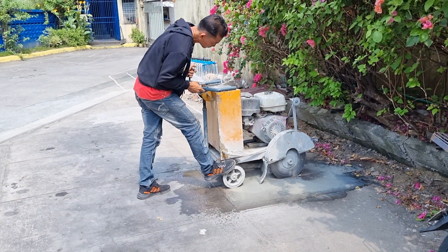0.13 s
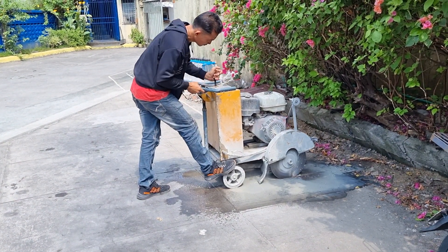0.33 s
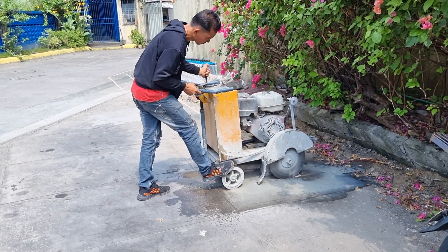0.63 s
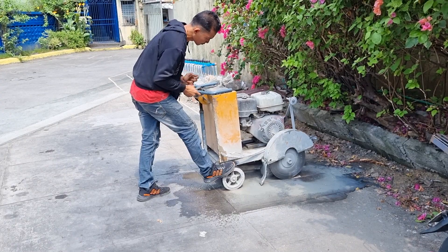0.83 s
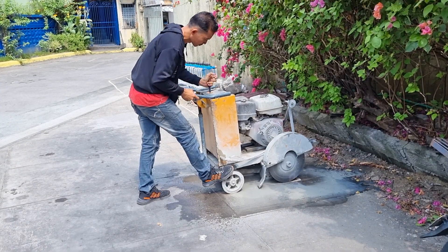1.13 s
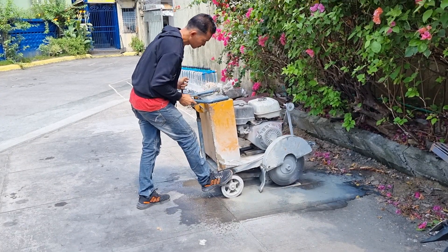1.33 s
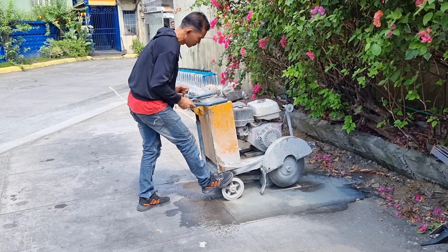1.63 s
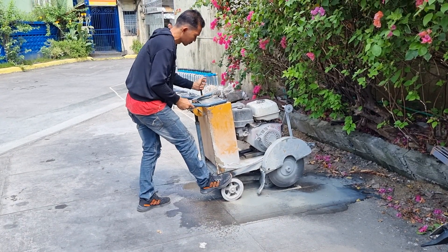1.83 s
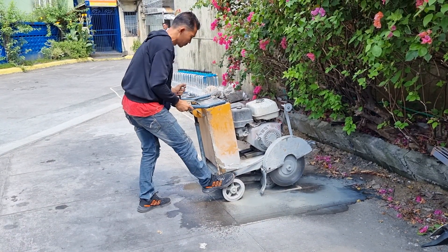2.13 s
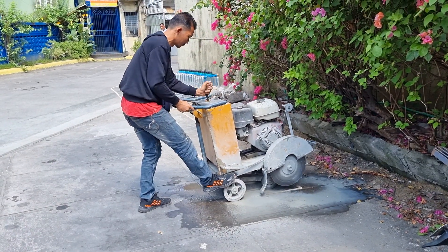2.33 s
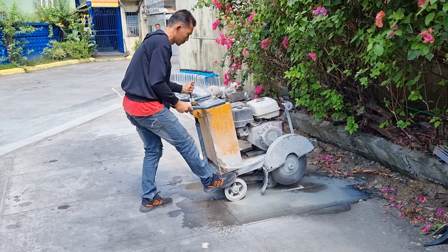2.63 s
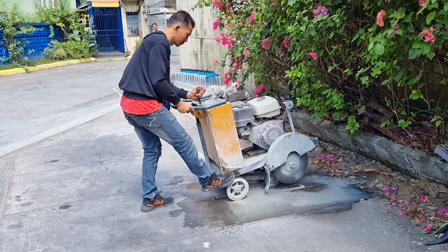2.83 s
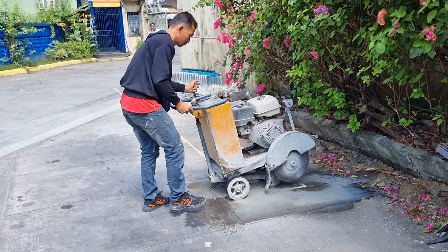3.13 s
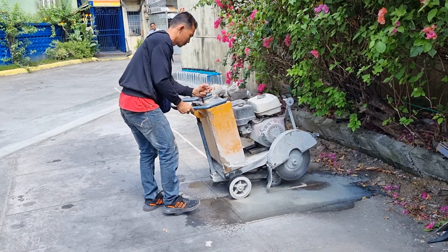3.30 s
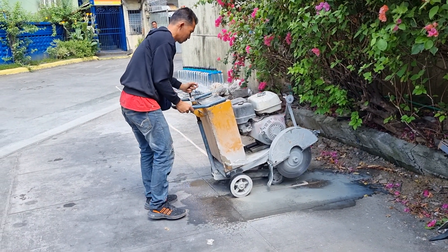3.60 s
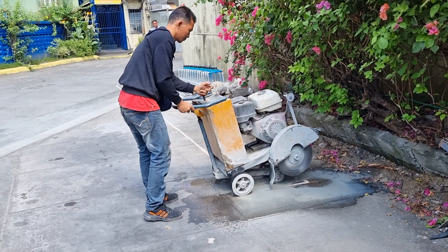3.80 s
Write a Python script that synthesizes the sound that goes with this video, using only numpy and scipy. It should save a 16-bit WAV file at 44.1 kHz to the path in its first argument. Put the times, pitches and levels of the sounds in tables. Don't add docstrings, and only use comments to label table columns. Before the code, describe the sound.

A walk-behind concrete saw with a steady single-cylinder engine grinds gritty pavement under a high metallic song; the blade soon lifts, leaving droning exhaust and rattling casing, captured outdoors by a phone in stereo.

```python
import sys
import numpy as np
from scipy import signal
from scipy.fft import rfft, irfft, next_fast_len
from scipy.io import wavfile
from scipy.ndimage import uniform_filter1d, map_coordinates

SR = 44100
rng = np.random.default_rng(int(sys.argv[2]) if len(sys.argv) > 2 else 0)


def linear_from_db(decibels):
    return 10 ** (np.asarray(decibels, float) / 20)


def unload_wav(signal):
    wavfile.write(
        sys.argv[1],
        SR,
        np.round(np.clip(np.atleast_2d(signal).T, -1, 1) * 32767).astype(np.int16),
    )


N = 174636


def unit(x):
    return x / np.sqrt(np.mean(x ** 2) + 1e-20)


def along(points, hz):
    f, v = np.transpose(points)
    return np.interp(np.log(hz + 1), np.log(f + 1), v)


def curve(rows):
    return np.interp(np.arange(N) / SR, *np.transpose(rows))


def wobble(rate):
    knots = rng.standard_normal(400)
    return map_coordinates(knots, [np.arange(N) * min(rate, 90) / SR])


def filtered(x, response):
    m = next_fast_len(N + SR // 2)
    return irfft(rfft(x, m) * response(np.fft.rfftfreq(m, 1 / SR)), m)[..., :N]


def ringing(x, peaks):
    def response(f):
        total = 0
        for k, (centre, width, db) in enumerate(peaks):
            damping = 1j * f * width
            total = total + (-1) ** k * linear_from_db(db) * damping / (centre * centre - f * f + damping)
        return total
    return filtered(x, response)


def patchy(depth_db):
    z = signal.stft(rng.standard_normal((2, N)), nperseg=512)[2]
    field = rng.standard_normal(z.shape[1:])
    field = uniform_filter1d(uniform_filter1d(field, 6, 0), 10, 1)
    return unit(signal.istft(z * linear_from_db(depth_db * unit(field)), nperseg=512)[1][:, :N])


# start_s, firings_per_s
ENGINE_SPEED = [
    (0, 27.4),
    (.4, 27.2),
    (.9, 27.38),
    (1.6, 27.28),
    (2.2, 27.45),
    (3.2, 27.34),
    (3.96, 27.42),
]


def engine_cycle():
    return np.cumsum(curve(ENGINE_SPEED)) / SR


EXHAUST_ORDERS_DB = [-17, -6.5, -13.5, 1.5, -5.5, -7, -12.5, -12.5, -13, -13, -16, -17.5, -18.5, -26]
WHINE_ORDERS = [20, 26, 27, 31, 33, 34, 42, 45, 47, 52, 64, 80]
WHINE_DB = [-12, -18, -7.5, -8.5, -11.5, -6.5, -16.5, -12, -19.5, -10, -16, -12]
# pitch_hz, width_hz
SHAFT_TONES = [(200, 10), (224, 5), (8742, 12), (14987, 12)]
SHAFT_DB = [-42.5, -35.5, -57.5, -69]


def exhaust(cycle):
    exhaust_db, waver_db, waver_rad = -31, 0.5, 0.27
    low = [(k + 1, db) for k, db in enumerate(EXHAUST_ORDERS_DB)]
    orders = np.zeros(N)
    for k, db in low + list(zip(WHINE_ORDERS, WHINE_DB)):
        level = linear_from_db(db + waver_db * wobble(11))
        drift = rng.uniform(0, 2 * np.pi) + waver_rad * (1 + k / 20) * wobble(6)
        orders += level * np.sin(2 * np.pi * k * cycle + drift)
    hum = np.zeros(N)
    for (hz, width), db in zip(SHAFT_TONES, SHAFT_DB):
        hum += linear_from_db(db) * unit(ringing(rng.standard_normal(N), [(hz, width, 0)]))
    return linear_from_db(exhaust_db) * np.sqrt(2) * orders + hum


# pitch_hz, width_hz, level_db
CASING_MODES = [(212, 97, -7.5), (570.6, 40, -7.5), (718, 90.6, 1), (956, 140, -4.5), (1273, 174, -5.5),
                (1393, 140, -3), (1746, 120, -6.5), (2304, 84, -12), (2613, 87, -8), (7760, 1600, -22.5)]


def casing(cycle):
    knock_db, rattle_db = -37, -25
    scatter_db, jitter_s, second_turn_db = -1, 0.000088, 6
    turns = np.flatnonzero(np.diff(np.floor(2 * cycle)))
    chance = rng.standard_normal((400, 2))[:len(turns)]
    late = np.round(jitter_s * SR * chance[:, 0]).astype(int)
    at = np.clip(turns + late, 0, N - 1)
    knocks = np.zeros(N)
    knocks[at] = linear_from_db(scatter_db * chance[:, 1] + second_turn_db * (np.arange(len(turns)) % 2))
    pulse = 1 + .15 * np.cos(4 * np.pi * cycle) + 0.099 * np.cos(2 * np.pi * cycle)
    rattle = patchy(0.85) * pulse
    return linear_from_db(knock_db) * unit(ringing(knocks, CASING_MODES)), linear_from_db(rattle_db) * unit(ringing(rattle, CASING_MODES))


# start_s, level_db
CONTACT = [
    (0, 3),
    (.2, 3.5),
    (.3, 5.5),
    (.46, 3),
    (.55, 5.5),
    (.65, 3.5),
    (.7, 5),
    (.76, 1.5),
    (.83, 2),
]
LIFT_S, LIFT_FADE_S = .845, .015


def bite(t):
    return linear_from_db(curve(CONTACT)) / (1 + np.exp(np.clip((t - LIFT_S) / LIFT_FADE_S * 3, -50, 50)))


# pitch_hz, level_db per Hz
GRIT_COLOUR = [(1200, -6), (2500, 4.5), (5000, 0.5), (6000, 6), (7500, 1.5), (10000, -1), (12000, -6.5),
               (15800, -3.5)]


def grit(pressure):
    def colour(hz):
        notch = 1 - np.exp(-((hz - 5690) / 90) ** 2)
        return linear_from_db(along(GRIT_COLOUR, hz)) * notch
    noise = patchy(2.2) * linear_from_db(.9 * wobble(11.4))
    return linear_from_db(-25.5) * unit(filtered(noise, colour)) * pressure


# pitch_hz, width_hz
DISC_MODES = [(3036, 12), (3605, 12), (3780, 20), (4510, 20), (4570, 30), (5092, 12), (5164, 14),
              (5255, 14), (5410, 12), (5523, 12), (6234, 12), (6468, 14), (7517, 14), (15688, 14)]
DISC_DB = [-2, -5, -10, -12, -4.5, -10, 0, 2.5, -2, -13, -5, 5.5, -2.5, -17]


def disc(pressure):
    drive = patchy(2.5)
    modes = [(hz, width, db) for (hz, width), db in zip(DISC_MODES, DISC_DB)]
    return linear_from_db(-30) * ringing(drive * pressure, modes) / np.std(ringing(drive, modes))


# pitch_hz, peak_s, span_s (15 dB down this far from the peak)
SINGING = [
    (4060, .35, .75),
    (4230, .3, .42),
]
SINGING_DB = [-26.5, -29.5]


def singing(t):
    start_s, ring_s, flutter_db = .035, .07, 2.8
    ring_on = np.exp(-np.maximum(t - LIFT_S, 0) / ring_s) * (1 - np.exp(-(t / start_s) ** 2))
    song = np.zeros((2, N))
    for (hz, peak_s, span_s), db in zip(SINGING, SINGING_DB):
        level = linear_from_db(db - 15 * ((t - peak_s) / span_s) ** 2 + flutter_db * wobble(19.8))
        phase = 2 * np.pi * hz * t + .8 * wobble(14.9) + [[0], [1.2]]
        song += level * ring_on * np.sin(phase)
    return song


def blade():
    t = np.arange(N) / SR
    pressure = bite(t)
    return grit(pressure) + disc(pressure) + singing(t)


# pitch_hz, level_db per Hz
FAN_COLOUR = [(60, -5), (200, -3), (450, -9), (1200, -7.5), (3000, -8.5), (5600, -16.5), (9200, -26),
              (16000, -32)]


def fan(cycle):
    pulse = 1 + .15 * np.cos(4 * np.pi * cycle + 1)
    rush = patchy(1.24) * pulse * linear_from_db(0.43 * wobble(8))
    return linear_from_db(-25.5) * unit(filtered(rush, lambda hz: linear_from_db(along(FAN_COLOUR, hz))))


def clatter(cycle):
    ticks_per_s = 1800
    pulse = 1 + .15 * np.cos(4 * np.pi * cycle + 1)
    shake = linear_from_db(0.85 * wobble(16) + 0.95 * wobble(8.6)) * pulse
    ticks = (rng.random(N) < ticks_per_s / SR) * shake * rng.standard_normal((2, N))
    return linear_from_db(-47) * unit(filtered(ticks, lambda hz: hz ** 2 / (hz ** 2 + 9000 ** 2)))


def bearing(cycle):
    flicker = linear_from_db(4.5 * wobble(30) + 2 * wobble(7.2)) * (1 + .4 * np.cos(4 * np.pi * cycle))
    noise = rng.standard_normal((2, N)) * flicker
    return linear_from_db(-46) * unit(ringing(noise, [(13600, 200, 0)]))


# pitch_hz, correlation
ALIKE = [(120, 0.95), (250, 0.99), (450, 0.69), (750, 0.91), (1300, 0.59), (2500, 0.46), (4200, 0.66),
         (9000, 0.16)]


def spread(noises):
    def turn(hz):
        angle = np.arccos(np.clip(along(ALIKE, hz), -1, 1)) / 2
        return np.array([np.cos(angle), np.sin(angle)])
    return filtered(noises, turn)


def scene():
    cycle = engine_cycle()
    knock, rattle = casing(cycle)
    mid, side = spread(rattle + fan(cycle) + clatter(cycle) + blade() + bearing(cycle))
    mid = mid + knock + exhaust(cycle)
    return np.array([mid + side, mid - side])


# pitch_hz, lead_rad
LEFT_LEADS = [(600, 0.0095), (800, 0.052), (1120, -1.44), (1400, -0.76), (3600, -0.95), (5200, 1.45),
              (7600, 0.67), (13800, 1.4)]
# pitch_hz, level_db
RIGHT_LOW = [(150, 0.33), (700, -2), (1300, 0.5), (2000, 3), (2500, 5.5), (3200, 3.5), (3750, 16),
             (4600, 16.5)]
# pitch_hz, level_db
RIGHT_HIGH = [(4600, 0.5), (5200, -15), (5900, -29.5), (7000, -14.5), (8200, -3.5), (9500, -8),
              (11500, -15), (15000, -8.5)]


def ports(x):
    def response(hz):
        bass_db = 4 / (1 + (hz / 70) ** 2)
        left = np.exp(1j * along(LEFT_LEADS, hz))
        right = linear_from_db(along(RIGHT_LOW, hz) + along(RIGHT_HIGH, hz) - bass_db)
        band = (hz < 15760) * hz ** 4 / (hz ** 4 + 36 ** 4)
        return np.array([left, right]) * band
    return filtered(x, response)


def roll_off(x):
    return signal.sosfilt(signal.butter(12, 15760, fs=SR, output="sos"), x)


# start_s, level_db
GAIN = [
    (0, 3),
    (.25, 1.5),
    (1.82, 1.5),
    (2.05, 5.5),
    (2.32, 9),
    (2.5, 8),
    (3.5, 7.5),
    (3.96, 9),
]


def record(dry):
    x = ports(dry) * linear_from_db(curve(GAIN) - 4)
    limit = 1.15
    x = np.clip(x / (1 + np.abs(x / limit) ** 4) ** (1 / 4), -1, 1)
    return roll_off(x)


dry = scene()
out = record(dry)
unload_wav(out)
```